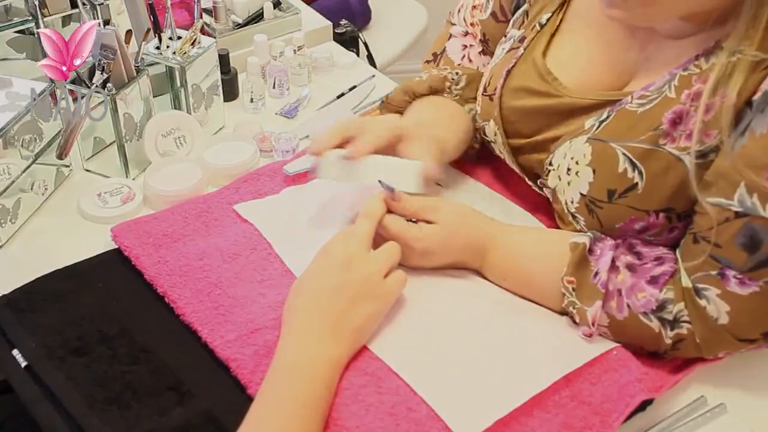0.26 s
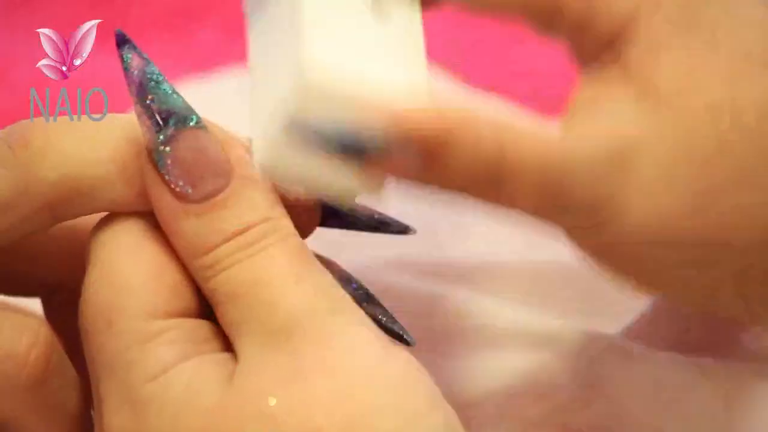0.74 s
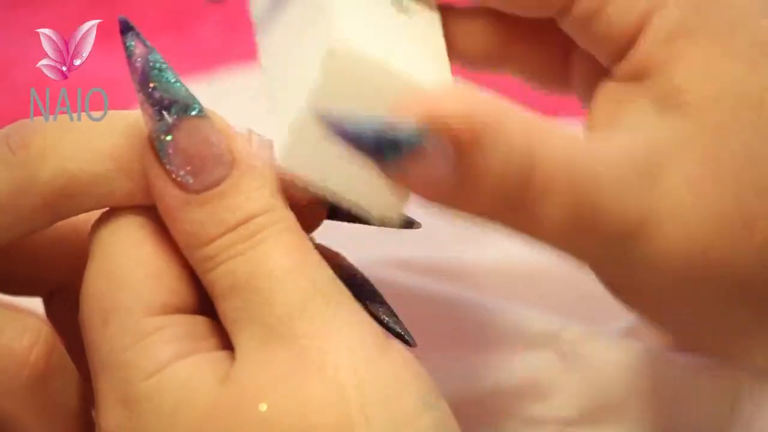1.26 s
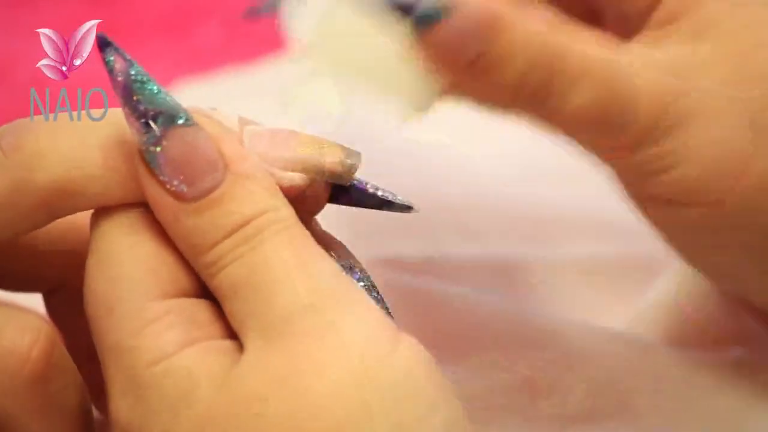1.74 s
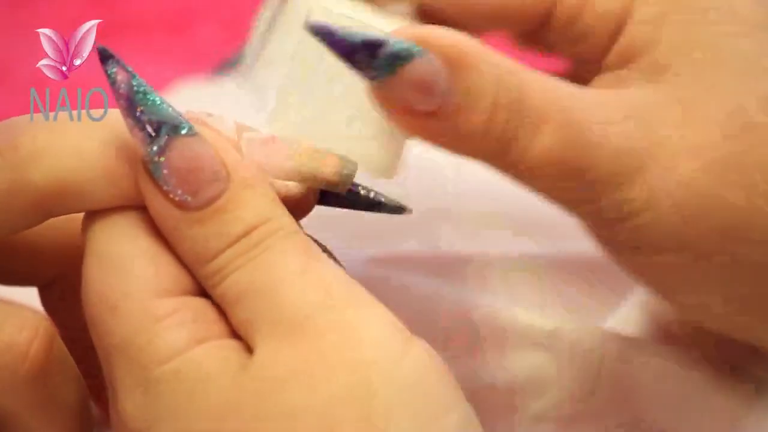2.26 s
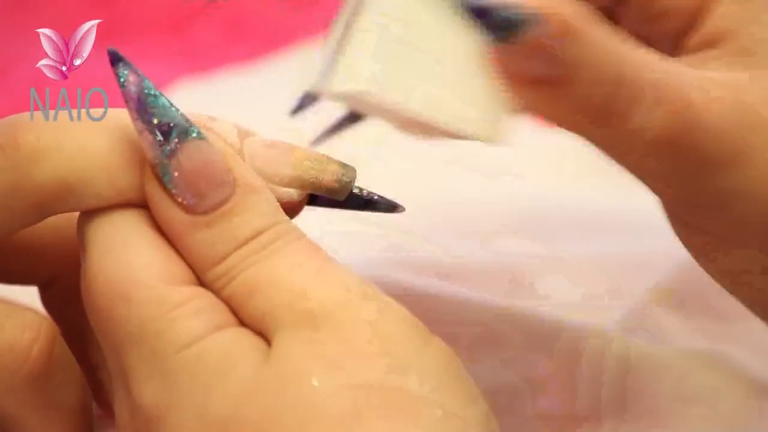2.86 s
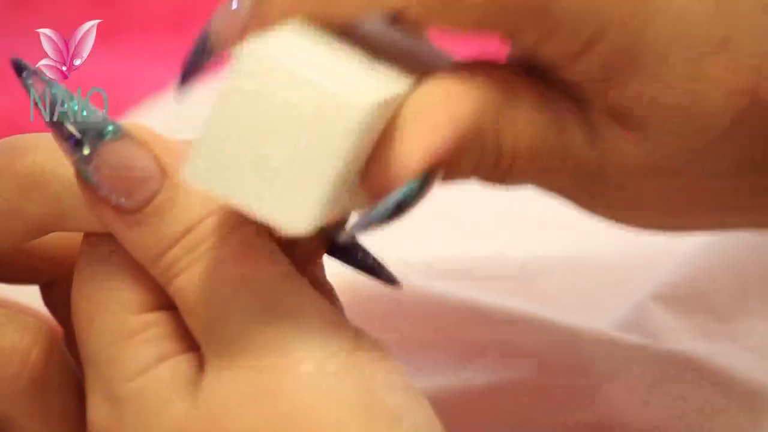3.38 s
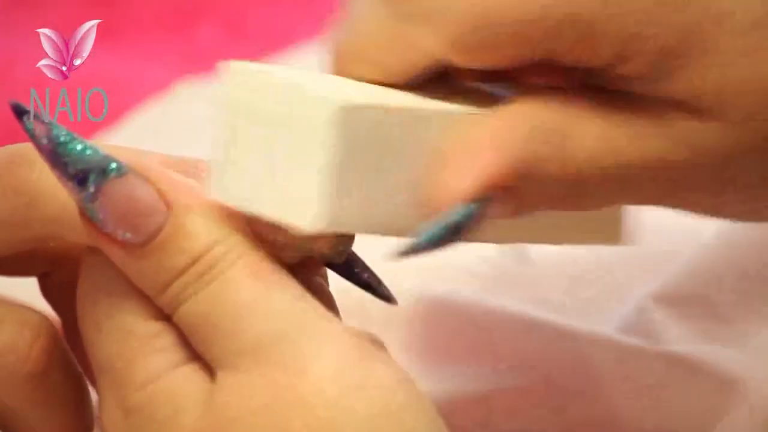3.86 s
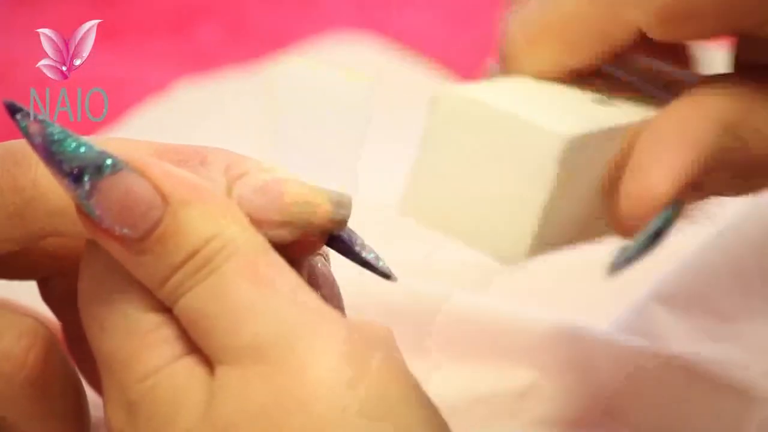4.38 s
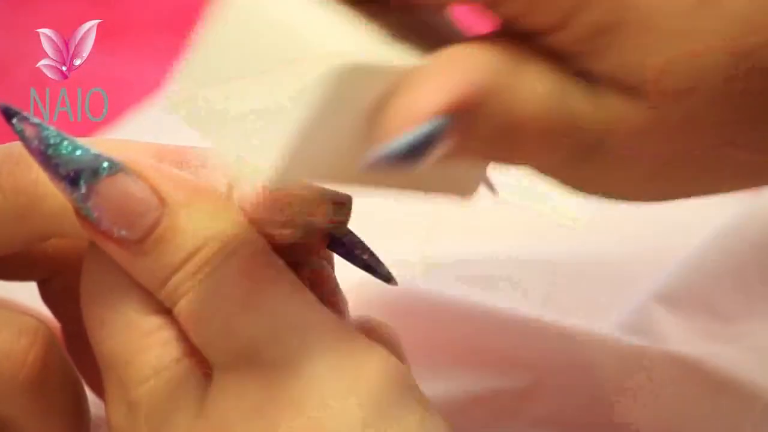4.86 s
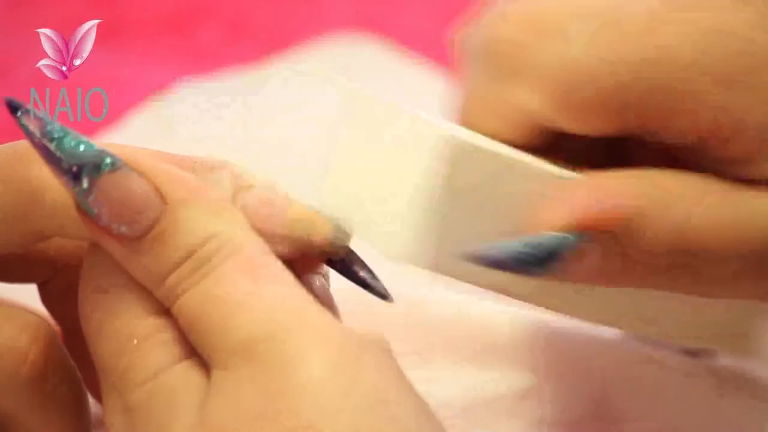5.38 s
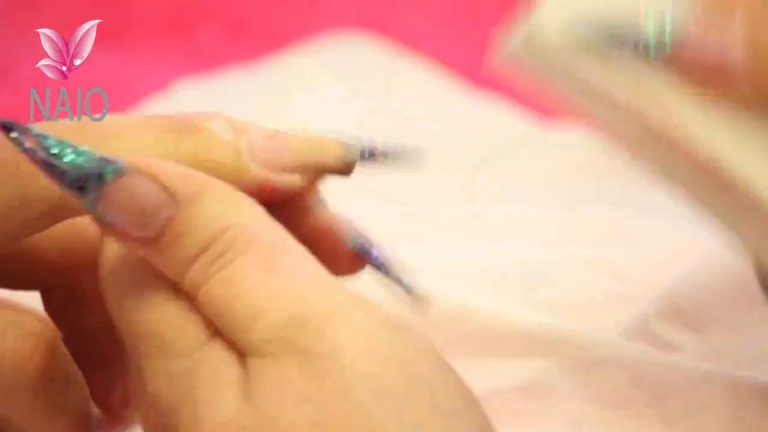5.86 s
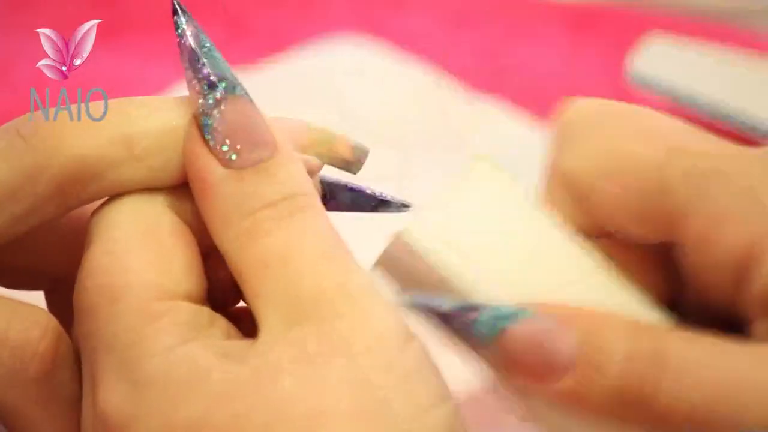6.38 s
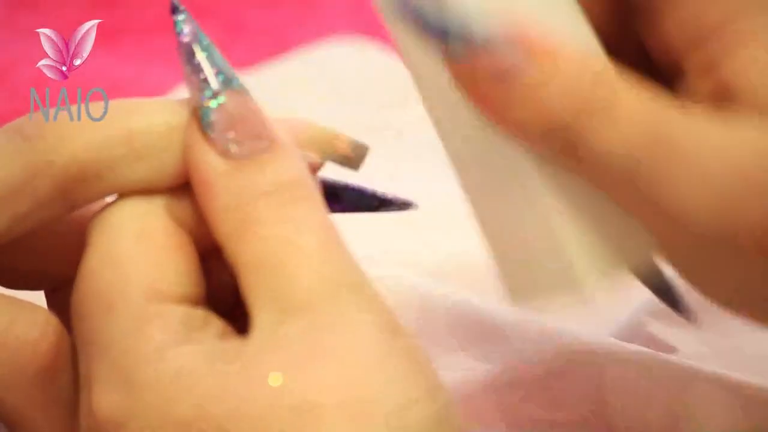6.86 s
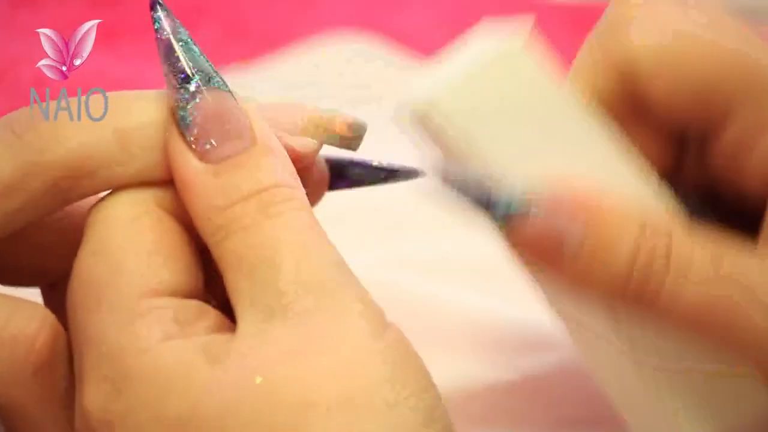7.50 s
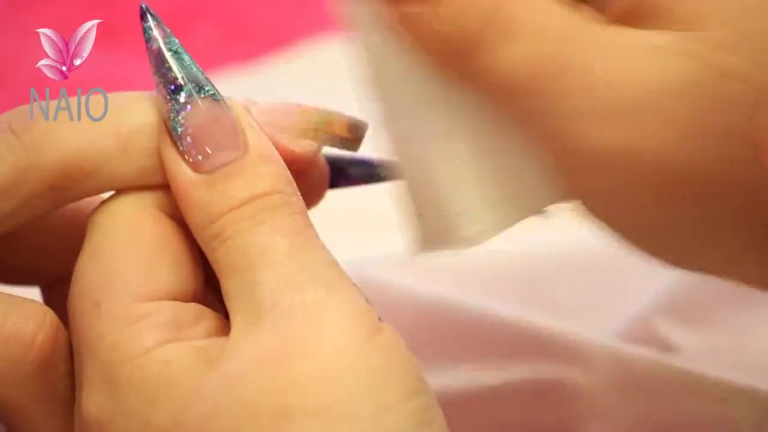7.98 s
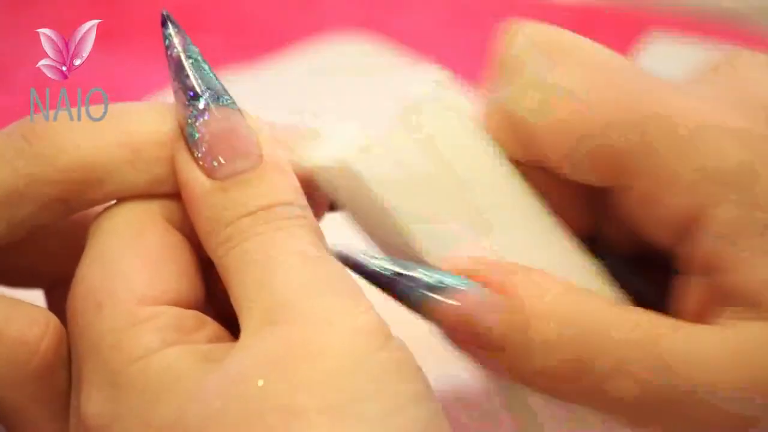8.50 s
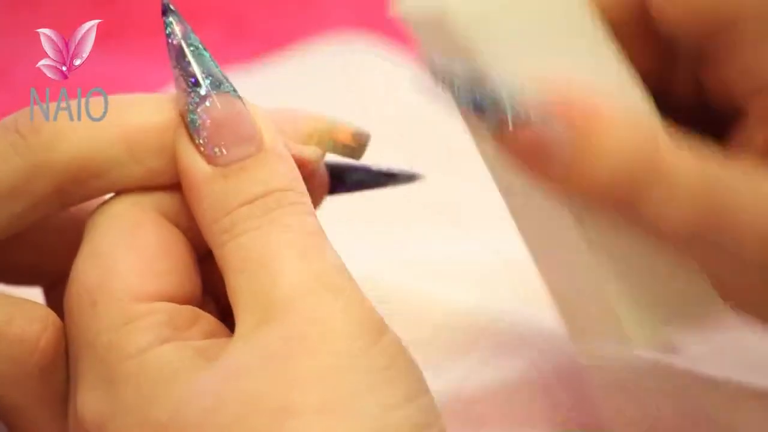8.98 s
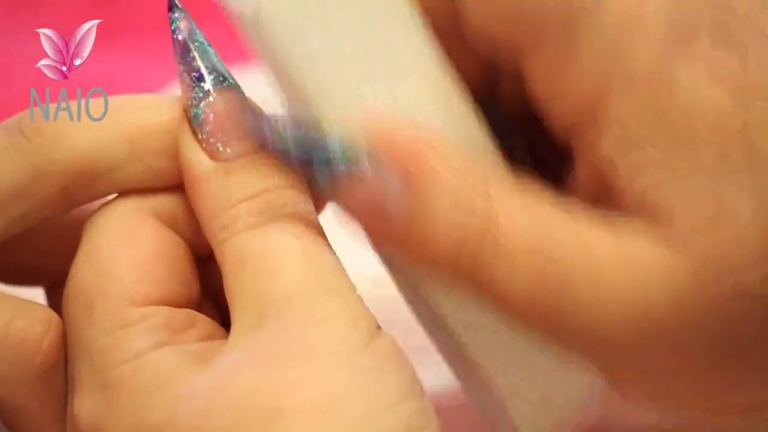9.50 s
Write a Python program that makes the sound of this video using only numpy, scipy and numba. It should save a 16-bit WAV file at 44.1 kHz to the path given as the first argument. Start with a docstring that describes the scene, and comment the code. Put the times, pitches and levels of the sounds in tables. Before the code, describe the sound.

Quick, dry, sandy scrapes of a buffing block on a fingernail, heard very close indoors. After about two seconds the strokes become more widely spaced, and later they grow slightly longer and duller, often finishing with a small click of the nail tip. Fingers rustle faintly on the foam, with scattered ticks and soft knocks. A faint electrical hum and room hiss lie underneath.

```python
"""Buffing a fingernail, close up

A foam buffing block rubs a long hard fingernail, close to the microphone in a small quiet room.
Grit catches thousands of times a second and rings block and nail; strokes often end as the nail tip
flicks off the edge. Ticks, dull taps and a faint rustle fall in between, over mains hum and room hiss."""
import sys
import numpy as np
from scipy import signal
from scipy.fft import rfft, irfft, next_fast_len
from scipy.io import wavfile
from numba import njit

SR = 44100
rng = np.random.default_rng(int(sys.argv[2]) if len(sys.argv) > 2 else 0)


def store_pcm(level_fs):
    """Save levels as 16-bit WAV."""
    pcm = np.round(np.clip(level_fs, -1, 1) * 32767).astype(np.int16)
    wavfile.write(sys.argv[1], SR, np.atleast_2d(pcm).T)


N = 429534

# strokes of the block, the short ones only light brushes: (start [s], end [s], level [dB], swell early to late
# [dB], brightness [dB])
BUFF_STROKES = [(.01, 0.107, -23, -7, -1.5), (0.142, 0.234, -29, -10.5, -0.5),
                (0.26, 0.342, -23.5, -4.5, 0.5), (0.379, 0.465, -24.5, -4.5, 1),
                (0.5, 0.595, -24.5, -4, -0.5), (0.626, 0.716, -25, -4.5, 1.5),
                (0.749, 0.861, -23.5, -5.5, 0), (1.022, 1.124, -25, -6, -1), (1.142, 1.185, -37.5, -7, 23),
                (1.185, 1.237, -30, 8, 12.5), (1.259, 1.342, -26, -4, 1.5), (1.364, 1.455, -25, -2, 4.5),
                (1.476, 1.565, -22.5, -1.5, -1), (1.592, 1.677, -25.5, -3.5, 1.5),
                (1.7, 1.792, -22, -5, -2.5), (1.942, 1.946, -34.5, 6, -2), (1.963, 2.071, -23, -3.5, -1),
                (2.222, 2.338, -25, -5, 0.5), (2.484, 2.61, -26.5, -0.5, 1.5), (2.762, 2.889, -26.5, -1, 1),
                (3.036, 3.149, -26.5, -1.5, -0.5), (3.174, 3.21, -46, 3, 19), (3.22, 3.251, -37, -8, 5),
                (3.264, 3.297, -30, 1, 18), (3.346, 3.397, -34, -12.5, 18), (3.507, 3.662, -27, -0.5, 2.5),
                (3.844, 3.846, -31, 0, -12), (3.883, 4.049, -28, 2, -0.5), (4.118, 4.152, -34, 9, -8),
                (4.253, 4.401, -28, 1, -1.5), (4.537, 4.57, -38, -3, -25), (4.603, 4.606, -31, 2, -18),
                (4.636, 4.779, -28.5, 3.5, 1.5), (4.923, 4.953, -39, -4, -9),
                (4.989, 5.147, -28.5, 1, -0.5), (5.339, 5.351, -33.5, -3, 17),
                (5.368, 5.494, -27.5, 3.5, 0.5), (5.606, 5.632, -31, -5, -3), (5.691, 5.693, -35, 12, -3),
                (5.724, 5.856, -27, 2.5, 0), (5.93, 5.992, -29, 3, 6), (6.041, 6.053, -25, -1, -10),
                (6.063, 6.065, -28, 0, -5), (6.073, 6.097, -31, -14, -16), (6.265, 6.471, -24, -1.5, 0),
                (6.686, 6.856, -25.5, -2, -1), (7.047, 7.224, -25, -3, -1), (7.391, 7.574, -25, 0.5, -2.5),
                (7.755, 7.941, -26.5, 3.5, -1.5), (8.099, 8.275, -27.5, -2, -4),
                (8.462, 8.643, -27, -2, -3.5), (8.814, 8.828, -43, 6, -10), (8.838, 9.01, -27, -1.5, -2),
                (9.189, 9.387, -27.5, 0.5, -0.5), (9.562, 9.732, -27, 2, 1)]
# the nail tip leaving the edge: (time [s], peak [dB], pitch [Hz], rasp [dB])
TIP_FLICKS = [(3.657, -5, 2580, -16), (4.043, -27, 2260, -21), (4.397, -3, 2540, -15),
              (4.772, -3, 2720, -15), (5.119, -24, 2300, -34), (5.491, -1.5, 2530, -14.5),
              (5.844, -10, 2900, -38), (6.449, -8, 2970, -30), (6.856, -7.5, 2850, -25),
              (7.555, -7.5, 2700, -11.5), (7.894, -6.5, 2730, -11), (8.275, -6.5, 2460, -16),
              (8.636, -6.5, 2680, -16), (8.997, -5, 2440, -18), (9.355, -5, 2500, -14.5),
              (9.705, -11, 2480, -18.5)]


def scrape():
    """Grit rings the block, whose pitch shifts with the grip, and the nail; faster rubbing is brighter."""
    # foam and finger under pressure: (centre [Hz], width [Hz], level [dB])
    body_modes = [(129, 224, -8.5), (381, 370, -2.5), (894, 430, -9.5), (1500, 1440, 3)]
    # nail rings, two low, one high, the sizzle, two airy: (centre [Hz], width [Hz], level [dB])
    nail_modes = [(3480, 1130, 0), (4060, 950, -11.5), (5356, 450, 0), (7995, 2370, 0), (12000, 3300, 2.5),
                  (13600, 2400, 0)]
    pressure, speed, block_hz, (low_db, high_db, sizzle_db, air_db, body_db) = hand()
    shared = grit()
    catches = lambda: shared + 8.2 * grit()    # body and nail rings also get catches of their own
    uneven = lambda: from_db(1.6 * drift(50))
    wander = lambda: .03 * drift(12)
    slow_width_hz, fast_width_hz = 480, 950    # the block rings clearer when rubbed slowly
    block_width_hz = slow_width_hz + (fast_width_hz - slow_width_hz) * speed
    out = moving_ring(shared, block_hz * (1 + wander()), block_width_hz) * uneven()
    for hz, width_hz, db in body_modes:
        out += unit_rms(ring(catches(), hz, width_hz)) * from_db(db + body_db) * uneven()
    dull_db = -14.5 * (1 - speed)    # treble lost as the hand turns
    drives = [low_db + .42 * dull_db] * 2 + [high_db + dull_db, sizzle_db + dull_db]
    drives += [air_db + 1.8 * dull_db] * 2
    for (hz, width_hz, db), drive_db in zip(nail_modes, drives):
        bent_hz = hz * (1 + .0073 * (speed - .7) + wander())    # rises with speed, wanders with contact
        nail = moving_ring(catches(), bent_hz, np.full(N, width_hz, float))
        out += nail * from_db(db + drive_db) * uneven()
    return pressure * out


def grit(per_s=9000, spread_db=2.5):
    """The abrasive catches at random moments, now and then much harder."""
    sizes = from_db(spread_db * np.minimum(rng.exponential(1, N), 5)) * rng.choice([-1, 1], N)
    return unit_rms(sizes * (rng.random(N) < per_s / SR))


def hand(edge_db=-1.5, lifted_db=-23.5):
    """The hand lands, sweeps and lifts: gives pressure, speed (0-1), block pitch and five tone levels."""
    # how the block is held: (from [s], landing [s], lifting [s], fastest point [share of stroke],
    # bulge there [dB], block pitch early [Hz], middle [Hz], late [Hz], body rise over the stroke [dB],
    # nail low [dB], nail high [dB], sizzle [dB], air [dB], body [dB])
    grips = [(-1, 0.008, 0.017, 0.53, 2, 2330, 2470, 2260, 3, -2, -8.5, -11.5, -25, -21.5),
             (1.22, 0.0042, 0.013, 0.46, 1, 2400, 2600, 2270, 1.5, -3, -14.5, -15.5, -34, -21),
             (2.14, 0.0068, 0.047, 0.48, 4, 2390, 2660, 2300, -1, -6, -15.5, -14, -26, -20.5),
             (3.5, 0.029, 0.0098, 0.5, -0.5, 2380, 2220, 2430, 1.5, -5.5, -15, -11.5, -26.5, -18),
             (6, 0.0058, 0.035, 0.5, 2.5, 2050, 2310, 2180, 5, -7.5, -21, -17.5, -35, -22.5),
             (7.5, 0.0047, 0.02, 0.35, -2.5, 1960, 2350, 2060, 7.5, -9, -27, -14.5, -35, -19)]
    # a light brush: columns as a grip, from the fastest point on
    brush = (0.54, 0.5, 2377.5, 2446, 2388, -3, -5, -28.5, -29, -38, -16.5)
    # how far the tone follows brightness: (low, high, sizzle, air, body) [dB per dB]
    bright_shares = (0.12, 0.93, 0.96, 0.53, -0.054)
    t, pressure, speed = np.arange(N) / SR, np.zeros(N), np.zeros(N)
    pitch, colour = [], []
    for on, off, level_db, swell_db, bright_db in BUFF_STROKES:
        length = off - on
        grip = [row[1:] for row in grips if row[0] < on][-1]
        if length < .065:    # short contacts only brush the nail
            grip = (.005, .005, *brush)
        land, lift, fastest, bulge_db, early_hz, mid_hz, late_hz, rise_db, *tone = grip
        early, mid, late = on + length * np.array([.15, fastest, .85])
        early_db, late_db = level_db - swell_db / 2, level_db + swell_db / 2
        span = slice(max(int((on - land) * SR), 0), int((off + lift) * SR))
        db = np.interp(t[span], [on - land, on, early, mid, late, off, off + lift],
                       [early_db + lifted_db, early_db + edge_db, early_db, level_db + bulge_db,
                        late_db, late_db + edge_db / 2, late_db + lifted_db])
        pressure[span] = np.maximum(pressure[span], from_db(db))
        arch = np.interp(np.linspace(0, 1, len(db)), [0, fastest, 1], [0, np.pi / 2, np.pi])
        speed[span] = np.abs(np.sin(arch)) ** .52
        pitch += [(mid - .21 * length, early_hz), (mid, mid_hz), (late, late_hz)]
        *nail_db, body_db = np.array(tone) + bright_db * np.array(bright_shares)
        colour += [(on, *nail_db, body_db - rise_db / 2), (off, *nail_db, body_db + rise_db / 2)]
    catch_db, catch_s, slipped_db, reach = 7, .012, -2, SR // 20
    build = from_db(catch_db * np.exp(np.arange(-reach, 0) / SR / catch_s))
    for s, *_ in TIP_FLICKS:    # pressure builds before a flick; after it only the flat of the nail rubs
        at = int(s * SR)
        pressure[at - reach:at] *= build
        pressure[at + 60:at + reach] *= from_db(slipped_db)
    return pressure, speed, in_time(pitch)[0], in_time(colour)


def flicks(rise_s=.0028, fall_s=.00045):
    """The tip chatters and rasps ever harder on the edge, lets go with a thud, and is damped at once."""
    out = blows([row[0] for row in TIP_FLICKS], db=-32.5, hz=224, width_hz=480)
    t = np.arange(-800, 300) / SR
    swell = np.exp(np.where(t < 0, t / rise_s, -t / fall_s))
    rasp = noise_band(8550, 1460)
    for s, db, hz, rasp_db in TIP_FLICKS:
        span = slice(int(s * SR) - 800, int(s * SR) + 300)
        phase = rng.uniform(0, 2 * np.pi)
        lower_ring = from_db(-5.5) * np.sin(2 * np.pi * .828 * hz * t + phase)
        chatter = from_db(db) * (np.sin(2 * np.pi * hz * t + phase) + lower_ring) / 1.5
        out[span] += swell * (chatter + from_db(rasp_db - 12) * rasp[span])
    return out


def ticks_and_taps():
    """Ticks are a bright click on a short ring of the block; taps are a blunt knock and a low thud."""
    # small dry ticks: (time [s], click [dB], body [dB])
    dry_ticks = [(2.488, -53, -12), (3.289, -32, -20), (3.305, -30, -22), (3.742, -42, -24),
                 (3.759, -50, -13), (3.796, -40, -18), (4.146, -27, -13), (4.181, -36, -21),
                 (4.522, -36, -19.5), (4.848, -37, -24), (4.883, -25, -16), (5.21, -36, -24),
                 (5.235, -25, -23), (5.642, -39, -30), (6.077, -36, -17), (6.103, -25, -17),
                 (6.186, -20.5, -16), (8.1, -26, -21)]
    # taps of block or finger: (time [s], thud [dB], knock [dB])
    dull_taps = [(.0597, -29, -10), (.3258, -25.5, -11.5), (0.7478, -25, -23), (0.828, -34, -9.5),
                 (2.1366, -29, -10), (2.488, -23, -24), (2.6387, -28.5, -8), (2.765, -23.5, -21),
                 (3.0695, -26.5, -21), (4.601, -42, -25), (4.7603, -19, -15), (4.892, -32.5, -16.5),
                 (5.1377, -28.5, -23.5), (5.693, -38, -26), (6.1024, -28.5, -39), (6.1871, -25.5, -22),
                 (6.5236, -30, -44), (7.064, -23.5, -21), (7.4337, -26, -14.5), (7.9154, -21, -5.5),
                 (8.1002, -21.5, -15.5)]
    s, click_db, body_db = np.transpose([*dry_ticks, *crackle()])
    ticks = blows(s, click_db, 6800, 3000) + blows(s, body_db, 2730, 2250)
    s, thud_db, knock_db = np.transpose(dull_taps)
    thuds = blows(s, thud_db, 200, 430)
    knocks = blows(s, knock_db - 3.5, 510, 1600) + blows(s, knock_db - 8.5, 1630, 1200)
    foam = signal.butter(4, 9500, fs=SR, output="sos")    # foam blunts every contact
    return signal.sosfilt(foam, ticks - thuds - knocks)


def crackle(gap_s=.007, spread_db=4):
    """Faint uneven ticks come in short runs: rows of (time [s], click [dB], body [dB])."""
    # runs of ticks: (start [s], end [s], body [dB])
    runs = [(3.688, 3.82, -26), (4.15, 4.19, -27.5), (4.822, 4.9, -24.5), (5.18, 5.24, -27.5)]
    rows = []
    for start, end, db in runs:
        gap, click, body = rng.standard_normal((40, 3)).T
        s = start + gap_s * np.cumsum(np.exp(1.3 * gap))
        rows += list(np.transpose([s, db - 13 + spread_db * click, db + spread_db * body])[s < end])
    return rows


def rustle(swing_db=6, swing_peak=.65):
    """Fingers shift on the foam; the upper band swells in each pause as the block swings back."""
    # faint finger rustle: (time [s], level [dB])
    levels = [(0, -48.5), (.84, -45.5), (1.0, -58), (1.6, -48), (1.8, -61), (2.9, -59.5), (3.2, -47.5),
              (5.24, -53.5), (6.29, -47.5), (8.35, -51.5), (9.74, -61)]
    # its lower and upper band: (centre [Hz], width [Hz], level [dB])
    bands = [(2200, 2260, 0), (4250, 1200, -12)]
    low, high = [from_db(db) * noise_band(hz, width_hz) for hz, width_hz, db in bands]
    swing = []
    for (_, off, *_), (on, *_) in zip(BUFF_STROKES, BUFF_STROKES[1:]):
        swing += [(off, 0), (off + swing_peak * (on - off), swing_db), (on, 0)]
    level = from_db(in_time(levels)[0] + 1.5 * drift(10))
    return level * (low + from_db(in_time(swing)[0]) * high)


def room(x, t60_s=.42, wall_cut_hz=12000):
    """Near walls return the sound along eight paths, duller on every round."""
    size = next_fast_len(N + SR)
    w = 2 * np.pi * np.arange(size // 2 + 1) / size
    dull = 1 / (1 + 1j * w * SR / (2 * np.pi * wall_cut_hz))
    tail = 0
    for k, lag in enumerate((rng.uniform(.008, .022, 8) * SR).astype(int)):
        loop = from_db(-60 * lag / SR / t60_s) * dull * np.exp(-1j * w * lag)
        tail = tail + (-1) ** k * loop / (1 - loop)
    return irfft(rfft(x, size) * tail, size)[:N]


def room_tone(hiss_db=-50, mains_hz=50, mains_db=-51.5, drone_hz=64.3):
    """Steady room hiss lies under mains hum and a low drone, both slightly unsteady."""
    # colour of the hiss: (frequency [Hz], relative density [dB])
    hiss_spectrum = [(25, -11), (60, 2.5), (150, -6), (400, -14.5), (900, -20), (2000, -20), (6000, -34),
                     (9000, -33.5), (13000, -36.5), (15500, -60)]
    # swells of the drone: (time [s], level [dB])
    drone_levels = [(0.0, -57), (1.25, -42), (1.54, -43.5), (1.79, -55), (4.12, -66), (5.13, -48),
                    (5.51, -55.5), (9.58, -66.5), (9.74, -53)]
    hz, t = np.arange(N // 2 + 1) * SR / N + 1, np.arange(N) / SR
    knot_hz, knot_db = np.transpose(hiss_spectrum)
    colour = from_db(np.interp(np.log(hz), np.log(knot_hz), knot_db))
    hiss = from_db(hiss_db) * unit_rms(irfft(rfft(rng.standard_normal(N)) * colour, N))
    hum = from_db(mains_db + 2.2 * drift(2.3)) * np.sin(2 * np.pi * mains_hz * t + 1.1 * drift(1.1))
    drone_level = from_db(in_time(drone_levels)[0] + 2.9 * drift(9.4))
    drone = drone_level * np.sin(2 * np.pi * drone_hz * t + .36 * drift(2.4))
    return hiss + np.sqrt(2) * (hum + drone)


def blows(times, db, hz, width_hz):
    """Each blow is one click through a broad resonance, peaking at its level."""
    clicks = np.zeros(N)
    np.add.at(clicks, np.minimum((np.array(times) * SR).astype(int), N - 1), from_db(db))
    peak = np.abs(ring(signal.unit_impulse(400), hz, width_hz)).max()
    return ring(clicks, hz, width_hz) / peak


def noise_band(hz, width_hz):
    """Noise through a resonance, at unit rms."""
    return unit_rms(ring(rng.standard_normal(N), hz, width_hz))


def ring(x, hz, width_hz):
    """A two-pole resonance with gain 1 on top, applied twice for steep flanks."""
    r = np.exp(-np.pi * width_hz / SR)
    b = np.array([1, 0, -1]) * (1 - r * r) / 2
    a = [1, -2 * r * np.cos(2 * np.pi * hz / SR), r * r]
    return signal.lfilter(b, a, signal.lfilter(b, a, x + 1e-18) + 1e-18)


def moving_ring(x, hz, width_hz):
    """A steep resonance whose centre and width move, equally loud at every width."""
    turn, r = np.cos(2 * np.pi * hz / SR), np.exp(-np.pi * width_hz / SR)
    return unit_rms(moving_poles(moving_poles(x, turn, r), turn, r) / np.sqrt(width_hz))


@njit
def moving_poles(x, turn, r):
    """Two poles whose angle (cosine: turn) and radius change every sample."""
    y = np.zeros(len(x))
    for i in range(2, len(x)):
        y[i] = (1 - r[i] ** 2) * (x[i] - x[i - 2]) + 2 * r[i] * turn[i] * y[i - 1] - r[i] ** 2 * y[i - 2]
    return y


def drift(rate_hz):
    """Slow random motion at unit rms."""
    r = np.exp(-2 * np.pi * rate_hz / SR)
    return unit_rms(signal.lfilter([1], [1, -2 * r, r * r], rng.standard_normal(N + SR))[SR:])


def in_time(rows):
    """Columns of a timed table, joined by straight lines, one value a sample."""
    s, *columns = np.transpose(sorted(rows))
    return [np.interp(np.arange(N) / SR, s, c) for c in columns]


def from_db(db):
    """Decibels to gain."""
    return 10 ** (np.asarray(db) / 20)


def unit_rms(x):
    """Scale to unit rms."""
    return x / np.sqrt(np.mean(x ** 2) + 1e-20)


def scene():
    """Hands close to one microphone, with faint reflections and room tone behind."""
    hands = scrape() + rustle() + flicks() + ticks_and_taps()
    return (hands + from_db(-32) * room(hands) + room_tone())[None]


def record(dry):
    """The microphone chain cuts the top steeply, 80 dB down at 15.7 kHz."""
    return signal.sosfilt(signal.cheby2(20, 80, 15700, fs=SR, output="sos"), dry)


dry = scene()
out = record(dry)
store_pcm(out)
```